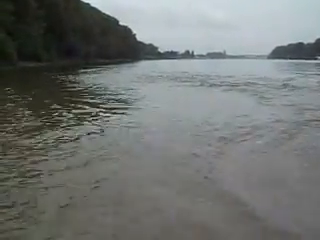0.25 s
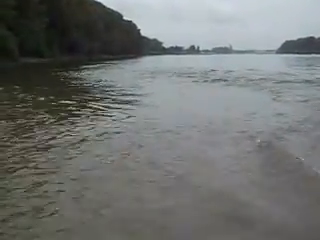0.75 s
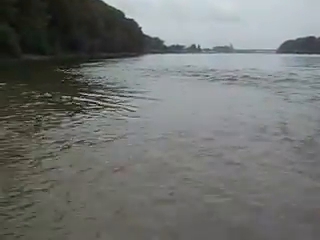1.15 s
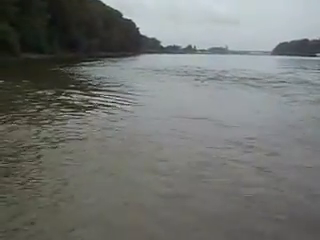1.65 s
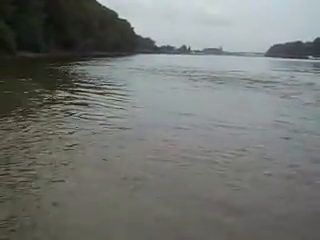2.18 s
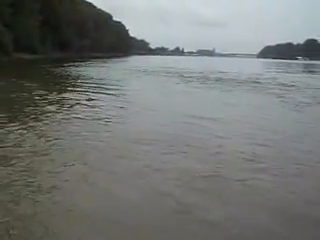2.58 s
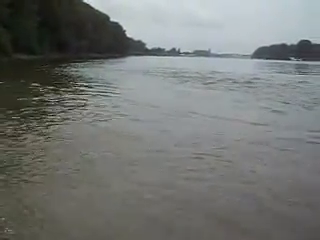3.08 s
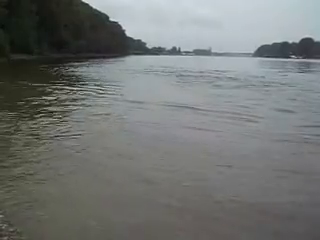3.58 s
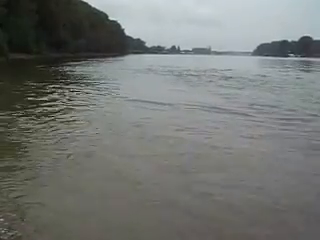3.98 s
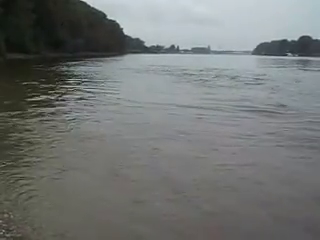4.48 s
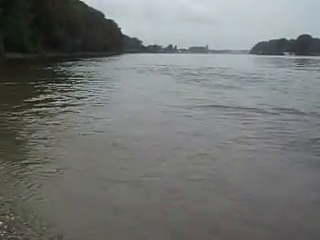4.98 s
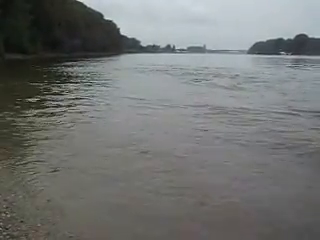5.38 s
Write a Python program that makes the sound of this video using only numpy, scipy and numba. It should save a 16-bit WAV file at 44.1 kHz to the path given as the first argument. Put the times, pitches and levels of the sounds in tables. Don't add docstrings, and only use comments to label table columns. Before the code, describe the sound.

A wave has already broken on a gravel river bank as the sound begins. From 0 to about 2.3 seconds its foam fizzes in a dense mid-high hiss, flickering with small ripple surges, while low churning bubbles fade beneath. Two bright pips stand out around 0.8 to 0.9 seconds, among rounded gulps. The fizz falls sharply after 2 seconds, with a soft clap and a cluster of plops near 2.3, and is gone by 3. Then gentle lapping remains: hollow gurgles, rising bloops and sparse tiny bubbles, with light claps around 3.65 and 4.1 to 4.3. From 4.6 water slops harder, strongest at 4.7, followed by a deep glug near 5.15 and small bright drops on stone until the end at 5.6. A faint low rumble and drone of the river lie underneath. Close, open-air mono sound from a small camera microphone, dull at the top.

```python
import sys
import numpy as np
from scipy import signal
from scipy.fft import rfft, irfft, next_fast_len
from scipy.io import wavfile
from scipy.ndimage import uniform_filter1d
from numba import njit

SR = 44100
rng = np.random.default_rng(int(sys.argv[2]) if len(sys.argv) > 2 else 0)


def linear_from_db(decibels):
    return 10 ** (np.asarray(decibels, float) / 20)


def store_pcm(level_fs):
    pcm = np.round(np.clip(level_fs, -1, 1) * 32767).astype(np.int16)
    wavfile.write(sys.argv[1], SR, np.atleast_2d(pcm).T)


N = 248724

# (time [s], fizz level [dB])
WASH = [
    (0, -22.5),
    (.4, -20),
    (.6, -23.5),
    (.72, -23.5),
    (.92, -23),
    (1.2, -24.5),
    (1.85, -23.5),
    (2.4, -41.5),
    (3.1, -63),
]
# (time [s], level above the wash [dB])
FOAM_SLOPS = [(.08, 1), (.39, -0.5), (.555, 6), (.6, 0), (.82, 1), (.9, 0), (.96, 4), (1.175, 1),
              (1.26, 3.5), (1.66, -3), (2.04, 5.5), (2.12, 5.5), (2.27, 5), (2.45, 8)]
# (frequency [Hz], density [dB per Hz])
FIZZ_SPECTRUM = [(760, -46), (1300, -19.5), (1960, -11), (2290, -3.5), (2720, 0), (3140, -1), (3500, -7.5),
                 (4550, -32), (7700, -120)]
SPRAY_SPECTRUM = [(1940, -28.5), (3300, -14.5), (3480, -5), (4400, -6.5), (4960, -12), (5500, -21),
                  (7150, -44.5), (12100, -120)]
CHURN_SPECTRUM = [(240, -44.5), (400, -15.5), (527, -9), (579, -9), (814, -4), (1300, -10), (1690, -42),
                  (2860, -120)]
# (time [s], gurgle level [dB])
LAPPING_LEVEL = [(0, -32.5), (.3, -27.5), (.9, -29.5), (1.1, -34), (1.4, -29.5), (1.8, -32), (2.2, -28),
                 (2.45, -30), (2.75, -29.5), (3.0, -29.5), (3.25, -31), (3.65, -30.5), (3.95, -32.5),
                 (4.18, -30.5), (4.38, -30.5), (4.6, -30.5), (5.2, -27.5), (5.64, -27)]
# (frequency [Hz], density [dB per Hz])
GURGLE_SPECTRUM = [(88, -33), (150, -10), (258, -3.5), (323, -6.5), (473, -1.5), (791, 0), (1050, -6),
                   (1300, -20), (1690, -51.5), (2860, -120)]
PATTER_SPECTRUM = [(710, -20.5), (1200, -7), (1330, -4.5), (1490, 2), (1670, 2.5), (2680, 1.5),
                   (3160, -0.5), (3480, -11.5), (3830, -8.5), (4430, -9), (5500, -18.5), (7150, -52.5),
                   (12100, -120)]
# (time [s], level [dB])
RIVER_SWELL = [(0, -36), (.3, -37.5), (.62, -44.5), (.8, -35.5), (1.7, -39), (2.94, -36), (3.6, -38),
               (4.6, -40), (5.04, -38), (5.64, -42)]
# (frequency [Hz], density [dB per Hz])
RUMBLE_SPECTRUM = [(7.1, -42), (12, 1.5), (54, 0), (97, -3.5), (150, -4.5), (257, -5), (350, -6),
                   (460, -36.5), (770, -120)]
# (time [s], peak level [dB], pitch [Hz], length [s])
GLUGS = [(0.093, -25, 243, 0.027), (0.812, -27, 336, .02), (0.836, -28, 285, 0.0617),
         (1.323, -25.5, 207, .018), (1.724, -25, 372, .024), (2.096, -24.5, 269, 0.018),
         (2.95, -27, 282, 0.028), (3.272, -30, 300, 0.026), (2.304, -28, 207, 0.014),
         (4.689, -23, 247, 0.012), (4.729, -27, 280, .018), (4.779, -20.5, 281, .05),
         (5.15, -15.5, 239.4, .028), (5.285, -23.5, 202, .05), (5.5, -22, 214, 0.032)]
# (time [s], peak level [dB], pitch [Hz], pitch rise [octaves])
GULPS = [(.178, -17, 934, .03), (.854, -14.5, 850, 0.27), (.934, -23, 761, .03), (1.579, -14, 680, 0.083),
         (2.154, -20.5, 750, 0.14), (2.33, -15.5, 461, .45), (2.328, -20, 785, .1),
         (2.348, -20.5, 544, .34), (2.58, -20.5, 727, .2), (2.73, -22, 640, 0.62), (2.759, -20, 464, .5),
         (4.323, -25.5, 835, 0.12), (3.08, -24.5, 780, 0.037), (3.51, -29, 688, 0.32),
         (3.66, -26.5, 790, 0.13), (3.693, -21, 610, .5), (3.715, -21.5, 810, 0.14),
         (3.86, -23, 595, 0.065), (4.134, -23.5, 746, 0.14), (4.186, -20, 539, 0.98),
         (4.203, -19.5, 708, 0.33), (4.591, -22.5, 468, 0.04), (4.633, -20.5, 516, 0.26),
         (4.662, -18.5, 618, 0.046), (4.709, -20, 545, 0.92), (4.713, -23, 1047, 0.25),
         (4.865, -18.5, 462, .4), (4.879, -16.5, 630, .6), (5.106, -22, 785, 0.048), (5.132, -26, 620, .2)]
# (time [s], peak level [dB], pitch [Hz])
PIPS = [(.817, -7, 3710), (0.906, -8, 3198), (2.352, -26, 1590), (2.778, -16, 3220), (2.79, -23.5, 2200),
        (3.176, -27, 2810), (3.325, -31, 4610), (3.407, -27, 2760), (3.527, -25, 1744),
        (4.361, -22.5, 2600), (4.44, -22, 1840), (4.917, -24.5, 4130), (5.165, -24.5, 2114),
        (5.213, -21.5, 3180), (5.261, -19.5, 2700), (5.475, -25, 4260), (3.601, -27, 1630)]
# (time [s], peak level [dB])
CLAPS = [(2.327, -16), (3.652, -18.5), (4.132, -19), (4.322, -20.5), (4.585, -17), (4.654, -13),
         (4.706, -6), (4.854, -14.5), (5.103, -14.5), (5.129, -12.5), (5.197, -29), (5.362, -22)]
# (time [s], peak level [dB])
SLAPS = [(4.4136, -23), (4.7102, -24), (4.9105, -23.5), (5.165, -19), (5.1954, -19.5), (5.3018, -20.5),
         (5.3966, -19.5), (5.556, -32.5)]
# (frequency [Hz], level against its twin below the fold [dB])
ALIAS_LEAK = [(5512, -5), (5685, -3), (6050, -11.6), (6480, -22.5), (6910, -38), (7190, -50.5),
              (7300, -96.5)]


def rms_one(x):
    return x / np.sqrt(np.mean(x ** 2) + 1e-20)


def in_time(rows):
    s, *columns = np.transpose(rows)
    return [np.interp(np.arange(N) / SR, s, c) for c in columns]


def drift(rate_hz):
    hop = 40
    r = np.exp(-2 * np.pi * rate_hz * hop / SR)
    noise = rng.standard_normal(N // hop + 2002)
    slow = signal.lfilter([1], [1, -2 * r, r * r], noise)[2000:]
    return np.interp(np.arange(N) / hop, np.arange(len(slow)), rms_one(slow))


def coloured(x, spectrum):
    size = next_fast_len(N)
    lines = rfft(x, size)
    hz = np.arange(size // 2 + 1) * SR / size + 1
    broad = np.sqrt(uniform_filter1d(np.abs(lines) ** 2, size=601)) + 1e-9
    points = np.array(spectrum)
    wanted = linear_from_db(np.interp(np.log(hz), np.log(points[:, 0]), points[:, 1]))
    return rms_one(irfft(lines / broad * wanted, size)[:N])


@njit
def add_bubbles(out, at, height, step, length, rise, snap):
    for k in range(len(at)):
        phase = 0.0
        for i in range(int(2.5 * length[k])):
            u = 2.5 * i / length[k]
            phase += step[k] * 2.0 ** (rise[k] * (i / length[k] - 0.4))
            j = at[k] + i
            if 0 <= j < len(out):
                envelope = 2.0 * (1.0 - np.exp(-snap * u)) ** 2 * np.exp(-u)
                out[j] += height[k] * envelope * np.sin(phase)


def bubbles(s, db, hz, length_s, rise):
    out = np.zeros(N)
    start = ((s - 0.3597 * length_s) * SR).astype(np.int64)
    add_bubbles(out, start, linear_from_db(db), 2 * np.pi * hz / SR, length_s * SR, rise, 3.63)
    return out


def swarm(spectrum, count, cycles, spread_db, rise, clump_db, noise_db):
    draw = rng.random((count, 5))
    low, high = spectrum[1][0] / 1.2, spectrum[-2][0] * 1.2
    hz = low * (high / low) ** draw[:, 1]
    sizes_db = -spread_db * np.log(draw[:, 2] + .02)
    length_s = cycles * (.4 + draw[:, 3]) / hz
    heard = bubbles(draw[:, 0] * N / SR, sizes_db, hz, length_s, rise * draw[:, 4])
    bed = coloured(rng.standard_normal(N), spectrum)
    clumps = linear_from_db(clump_db * (drift(2.6) + 0.33 * drift(30)))
    return rms_one(clumps * (coloured(heard, spectrum) + linear_from_db(noise_db) * bed))


def slops_db():
    attack_s, release_s = 0.0074, 0.025
    s, db = np.transpose(FOAM_SLOPS)
    since = np.maximum(np.arange(0, N, 32) / SR - s[:, None], 0)
    lift = db @ ((1 - np.exp(-since / attack_s)) * np.exp(-since / release_s))
    return 1.53 * np.repeat(lift, 32)[:N]


def collapse_db():
    fade_db_per_s = 6.5
    return in_time(WASH)[0] - 3 - fade_db_per_s * np.arange(N) / SR


def fizz(slop_db):
    hiss = swarm(FIZZ_SPECTRUM, count=14000, cycles=6, spread_db=2.5, rise=0.18, clump_db=-0.17, noise_db=-0.5)
    return linear_from_db(in_time(WASH)[0] + slop_db) * hiss


def spray(slop_db):
    drain_db_per_s = 16.5
    next_wave_s, next_rise_s, next_db = 4.55, 0.44, -47
    seconds = np.arange(N) / SR
    fallen_db = drain_db_per_s * seconds
    draining = linear_from_db(np.maximum.accumulate(in_time(WASH)[0] + fallen_db) - fallen_db - 7)
    thrown = linear_from_db(collapse_db() - 11)
    nearing = linear_from_db(next_db) * np.clip((seconds - next_wave_s) / next_rise_s, 0, 1)
    gain = np.hypot(draining, thrown) + nearing
    fine = swarm(SPRAY_SPECTRUM, count=10000, cycles=4, spread_db=5.0, rise=0.16, clump_db=0.25, noise_db=2.5)
    return gain * linear_from_db(0.47 * slop_db) * fine


def churn():
    low = swarm(CHURN_SPECTRUM, count=5000, cycles=5.98, spread_db=3.5, rise=0.79, clump_db=-2.5, noise_db=3.7)
    return linear_from_db(collapse_db()) * low


def foam():
    slop_db = slops_db()
    return fizz(slop_db) + spray(slop_db) + churn()


def gurgle():
    rising = swarm(GURGLE_SPECTRUM, count=4800, cycles=8.426, spread_db=2.5, rise=.6, clump_db=0.5, noise_db=-1.2)
    return linear_from_db(in_time(LAPPING_LEVEL)[0]) * rising


def patter():
    lapping_db, = in_time(LAPPING_LEVEL)
    lapping = linear_from_db(-36 + 0.61 * (lapping_db - lapping_db.mean()))
    gain = np.hypot(lapping, linear_from_db(collapse_db()))
    thin = swarm(PATTER_SPECTRUM, count=12000, cycles=7.61, spread_db=3.0, rise=0.21, clump_db=0.7, noise_db=1.0)
    return gain * thin


def river():
    drone_hz, drone_width_hz, drone_db = 60.8, 4.6, -47
    level_db = in_time(RIVER_SWELL)[0] + 2.0 + 0.54 * drift(12)
    rumble = linear_from_db(level_db) * coloured(rng.standard_normal(N), RUMBLE_SPECTRUM)
    b, a = signal.iirpeak(drone_hz, drone_hz / drone_width_hz, fs=SR)
    once = signal.lfilter(b, a, rng.standard_normal(N))
    return rumble + linear_from_db(drone_db) * rms_one(signal.lfilter(b, a, once))


def glugs():
    s, db, hz, length_s = np.transpose(GLUGS)
    return bubbles(s, db, hz, length_s, 0.29 + 0 * hz)


def gulps():
    s, db, hz, rise = np.transpose(GULPS)
    length_s = .011 + 2.5 / hz + .006 * rise
    return bubbles(s, db, hz, length_s, rise)


def pips():
    s, db, hz = np.transpose(PIPS)
    return bubbles(s, db, hz, 14.0 / hz, .04 + 0 * hz)


def bursts(rows, low_hz, high_hz, t60, lift_db):
    clicks = np.zeros(N)
    for s, db in rows:
        clicks[round(s * SR)] = linear_from_db(db + lift_db)
    decay = signal.lfilter([1], [1, -linear_from_db(-60 / (t60 * SR))], clicks + 1e-18)
    band = signal.butter(2, [low_hz, high_hz], "band", fs=SR, output="sos")
    return signal.sosfilt(band, decay * rng.standard_normal(N))


def claps():
    return bursts(CLAPS, 570, 1100, t60=0.046, lift_db=1)


def slaps():
    return bursts(SLAPS, 1500, 3300, t60=0.013, lift_db=7.0)


def scene():
    water = foam() + gurgle() + patter() + river()
    single_bubbles = glugs() + gulps() + pips()
    return (water + single_bubbles + claps() + slaps())[None]


def band_limit(x):
    return signal.sosfilt(signal.butter(12, 7250, fs=SR, output="sos"), x)


def record(dry):
    fold_hz, offset = 5512, -.0039
    size = next_fast_len(N)
    lines = rfft(dry, size)
    fold = round(fold_hz * size / SR)
    above = np.arange(fold, 2 * fold)
    leak_db = np.interp(above * SR / size, *np.transpose(ALIAS_LEAK))
    lines[:, 2 * fold:] = 0
    lines[:, above] = linear_from_db(leak_db) * np.conj(lines[:, 2 * fold - above])
    return band_limit(irfft(lines, size)[:, :N] + offset)


dry = scene()
out = record(dry)
store_pcm(out)
```